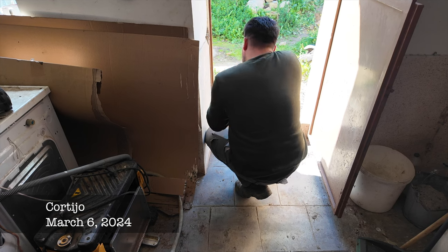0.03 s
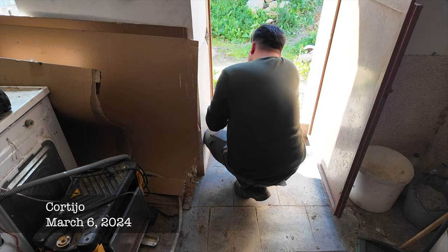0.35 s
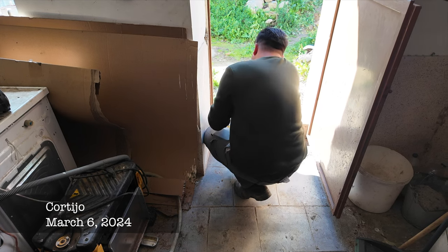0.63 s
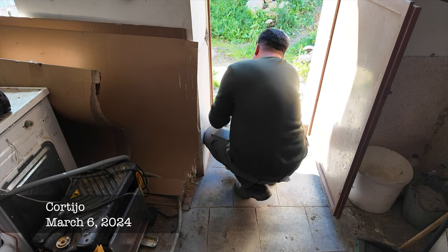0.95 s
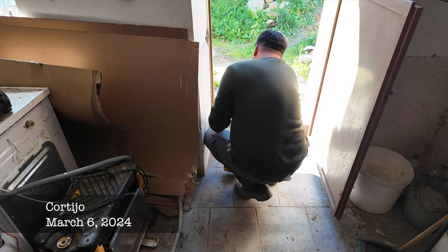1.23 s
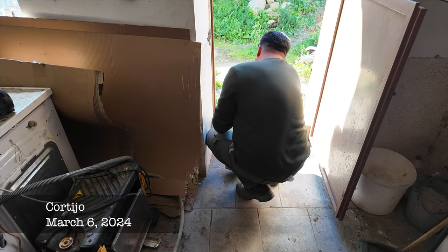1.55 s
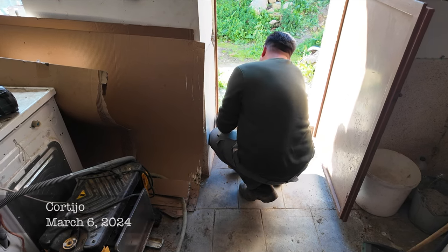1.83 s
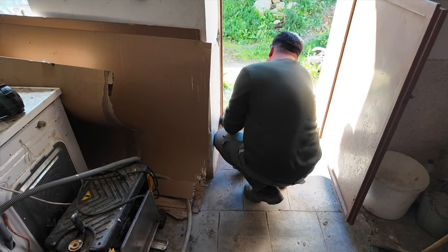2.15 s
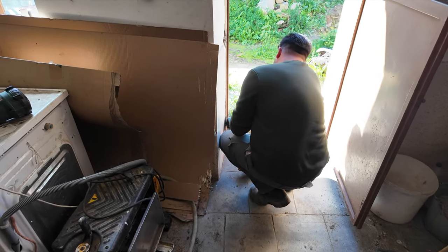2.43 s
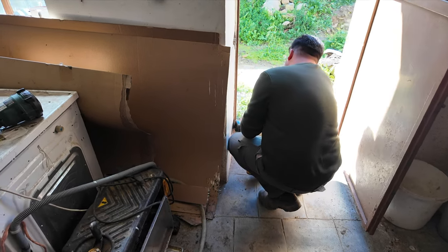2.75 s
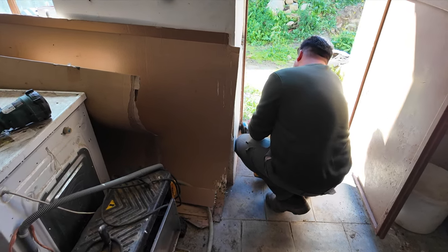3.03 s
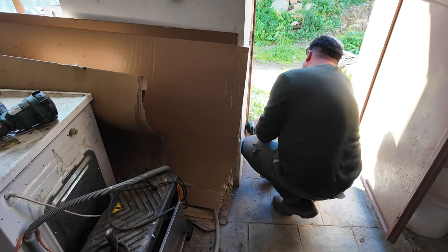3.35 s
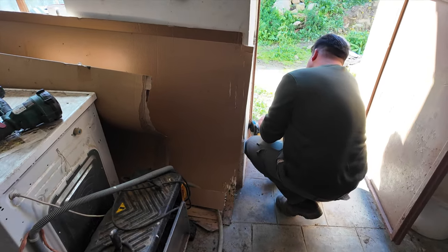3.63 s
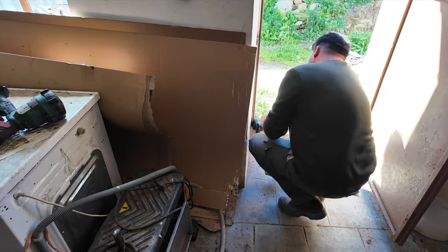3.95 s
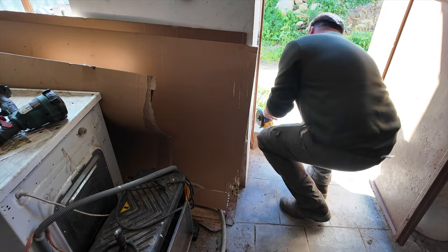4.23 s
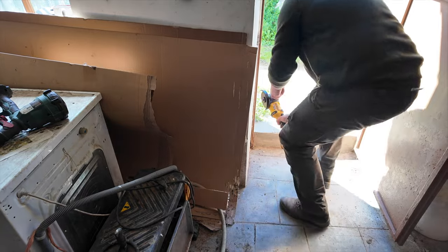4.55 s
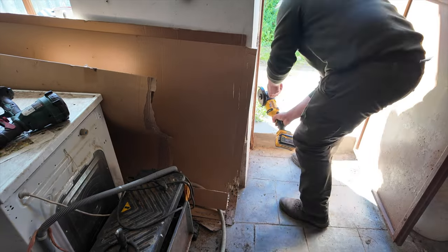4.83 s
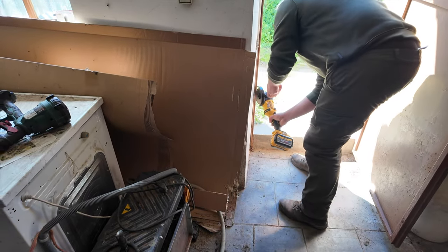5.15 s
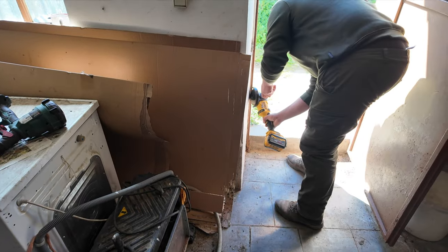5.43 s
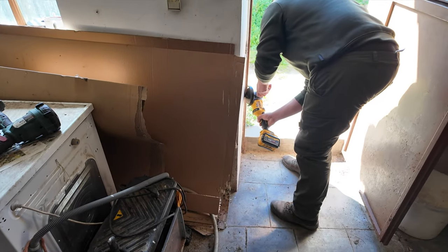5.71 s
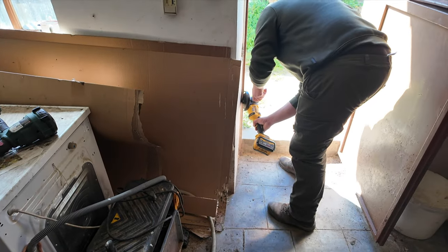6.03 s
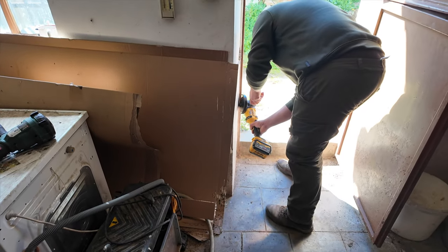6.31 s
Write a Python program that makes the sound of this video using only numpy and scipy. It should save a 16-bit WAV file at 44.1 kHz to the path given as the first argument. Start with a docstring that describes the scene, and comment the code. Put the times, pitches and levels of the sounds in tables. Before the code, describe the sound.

For the first second, shoes scuff softly and grit crunches on a tiled floor. At about 1 second a switch snaps and a cordless angle grinder winds up with a short rising howl, reaching full speed by 1.5 seconds: a steady, rattling gear whir over rushing air and a motor hum. From about 2.1 to 2.8 seconds the disc bites into a wooden door frame with a bright, hissing rasp and thin squeals. A second, longer cut starts with a dull knock at 3 seconds and lasts until 4.1. The grinder then runs free, its hum weaker and its buzz a little brighter, with two soft, low steps at about 4.2 and 4.7 seconds. The third cut runs from 5.4 seconds to the end, around 6.4, rasping and ringing with high whistling tones. Everything sounds nearby, in a small, hard room with short echoes.

```python
"""Angle grinder on a door frame

A man shuffles on gritty tiles, starts a cordless angle grinder and leans it three times into a wooden
door frame. Running free, its bevel gears rattle over the rush of the fan; in the cut the same grit
comes round on every turn and the disc sings on multiples of its speed.
A few dull knocks and steps sit underneath, in a small hard room."""
import sys
import numpy as np
from scipy import signal
from scipy.fft import rfft, irfft, next_fast_len
from scipy.io import wavfile
from scipy.ndimage import uniform_filter1d, map_coordinates

SR = 44100
rng = np.random.default_rng(int(sys.argv[2]) if len(sys.argv) > 2 else 0)


def persist_wave(psi):
    """Save psi, clipped to +-1, as 16-bit WAV."""
    counts = np.round(np.clip(psi, -1, 1) * 32767).astype(np.int16)
    wavfile.write(sys.argv[1], SR, np.atleast_2d(counts).T)


N = 281358
T = np.arange(N) / SR
PINION_TEETH, CROWN_TEETH = 10, 33
SWITCH_ON_S, LIFT_S, LIFT_TAKES_S = 1.028, 4.124, 0.25

# Spin-up, until the governor holds the speed. Each row: time in seconds, motor turns per second.
MOTOR_SPEED = [(1.03, 30), (1.1, 110), (1.2, 208), (1.25, 258), (1.36, 378), (1.43, 417), (1.49, 435),
               (1.55, 438.7)]
# The three cuts. Each row: start and end in seconds, disc ring in dB, treble lift of the fine dust in dB,
# share of the grit that repeats each turn (0-1), ducking of the running noise after one second in dB.
CUTS = [(2.075, 2.85, -42.5, 2.5, 0.35, 7.5), (3.002, 4.127, -40, 4, 0.27, 6.5),
        (5.392, 6.407, -39, 5, 0.4, 9)]


def cutting(disc):
    """Repeating grit and freshly torn fibres rasp and ring the disc, hardest where its rim runs high."""
    # Colours of the rasp and of the disc's ring. Each row: frequency in Hz, level in dB.
    rasp_colour = [(60, -75), (600, -47), (2000, -44), (3100, -7), (4400, -4.5), (5000, -5), (6200, -1.5),
                   (7000, 4.5), (8600, 3.5), (10000, 3), (10700, -4.5), (11300, 0), (12000, -10),
                   (13000, -0.5), (14900, -6), (15800, -1.5)]
    ring_colour = [(60, -75), (300, -54), (500, -17), (700, -18.5), (1000, -30.5), (1300, -10),
                   (1750, -13.5), (1950, -3.5), (2150, 1.5), (2550, -1), (2850, 5), (3150, -8.5),
                   (3800, -16), (6000, -40)]
    # How hard the disc bites, one curve a cut. Each row: time in seconds, relative level in dB.
    bite_curves = [
        [(2.095, -32), (2.129, -32), (2.169, -37), (2.339, -31), (2.505, -35.5), (2.665, -31), (2.791, -38.5),
         (2.809, -32.5), (2.84, -45.5)],
        [(3.005, -31.5), (3.029, -30.5), (3.053, -36), (3.593, -33.5), (3.623, -30), (3.875, -41),
         (3.891, -37.5), (4.095, -37.5), (4.1, -44)],
        [(5.39, -30.5), (5.444, -38.5), (5.482, -32), (5.522, -36.5), (5.612, -34), (6.088, -36), (6.12, -37.5),
         (6.238, -32.5), (6.37, -35.5)],
    ]
    rim, fibres = grit(disc, wear=0.257), noise()
    angle = 2 * np.pi * disc
    runout = amp(0.44 * np.cos(angle) + 0.31 * np.cos(2 * angle) + 2 * np.cos(3 * angle) + drift(rate=97))
    out = np.zeros(N)
    for (start, end, ring_db, dust_db, repeats, _), curve in zip(CUTS, bite_curves):
        drive = runout * (np.sqrt(repeats) * rim + np.sqrt(1 - repeats) * fibres)
        rasp, ring = colour(drive, rasp_colour), colour(drive + 0.16 * rim, ring_colour)
        dust = pass_filter(rasp, "high", hz=10500, order=3)
        bite = level(curve, fade=0.005)
        out += amp(-1) * bite * (rasp + dust * (amp(dust_db) - 1))
        # the disc rings harder as it lands, then follows the bite a little
        landing_db = 2 * held(start, start, .01, 0.036)
        follow = (bite / amp(np.transpose(curve)[1].mean())) ** 0.13
        out += amp(ring_db + landing_db) * follow * held(start, end, 0.0044, 0.028) * ring
    return out


def grit(disc, wear, size=332):
    """Roughness round the rim, met again on every turn; each of its ripples shifts a little as it wears."""
    turns, ripples = int(disc[-1]) + 2, size // 2 + 1
    fresh = 2 * np.pi * rng.random(ripples)
    worn = fresh + wear * np.cumsum(rng.standard_normal((turns, ripples)), axis=0)
    rim = irfft(np.exp(1j * worn), size, axis=1)
    return unit(map_coordinates(rim.ravel(), [disc * size], order=3, mode="nearest"))


def wandering_contact(x, depth_db):
    """As the point of contact wanders, patches of the spectrum swell and sink."""
    spectrum = signal.stft(x, SR, nperseg=512)[2]
    patches = uniform_filter1d(rng.standard_normal(spectrum.shape), size=8, axis=0)
    patches = unit(uniform_filter1d(patches, size=20, axis=1))
    return signal.istft(spectrum * amp(depth_db * patches), SR, nperseg=512)[1][:N]


def squealing(disc):
    """Modes of the disc swell into squeals, locked onto the nearest multiples of its speed."""
    # Each row: start and end in seconds, mode frequency in Hz, level in dB.
    squeals = [(2.24, 2.35, 2790, -56), (2.286, 2.335, 2260, -44), (2.34, 2.74, 1462, -42),
               (2.497, 2.734, 2260, -39.5), (2.697, 2.715, 1462, -45), (3.01, 4.084, 2260, -54),
               (3.01, 3.04, 2925, -42), (3.05, 3.36, 2790, -48), (3.37, 3.556, 2790, -45),
               (3.38, 3.757, 1462, -47.5), (3.565, 3.615, 1462, -46.5), (3.727, 3.99, 2790, -42),
               (3.91, 4.086, 1462, -46.5), (5.405, 5.477, 2790, -39), (5.433, 6.38, 2260, -45),
               (5.457, 6.38, 1462, -55), (5.583, 6.297, 2790, -44.5), (5.653, 5.93, 2260, -49)]
    swells = {}
    for start, end, hz, db in squeals:
        order = disc_harmonic(hz)
        swells[order] = swells.get(order, 0) + amp(db) * held(start, end, attack=0.0097, release=0.014)
    return sum(swell * amp(2.4 * drift(rate=16)) * tone(order * disc, waver=0.22, spread=0.49)
               for order, swell in swells.items())


def singing(disc):
    """Weaker tones of the disc build up through each cut and die after it; the high ones flicker most."""
    # One set of tones a cut. Each row: mode frequency in Hz, relative level in dB.
    tone_sets = [
        [(1061, -50.5), (1992, -48), (2390, -42.5), (4387, -52), (4780, -46), (6643, -45), (6923, -49),
         (8371, -49), (8635, -54), (9948, -44), (11294, -60)],
        [(931.3, -50.5), (2925, -49), (3327, -52), (6912, -54), (7311, -51), (7978, -55), (8236, -48),
         (8635, -45.5), (9706, -60), (9841, -58), (11294, -49)],
        [(532.9, -60.5), (931.3, -46.5), (1992, -47), (2390, -50), (2525, -52), (2659, -52), (4651, -47.5),
         (4920, -45.5), (5184, -46.5), (6110, -46.5), (6772, -47), (6907, -46), (8635, -41.5), (11294, -42)],
    ]
    build_s, fade_s = 0.15, 0.062
    out = np.zeros((2, N))
    for (start, end, *_), tones in zip(CUTS, tone_sets):
        on = (T > start) & (T < end + .3)
        build = 1 - np.exp(-(T[on] - start) / build_s)
        gain = amp(-2) * build * held(start, end - .04, .01, fade_s)[on]
        for hz, db in tones:
            unrest = 0.18 + 0.72 * hz / 10000
            flicker = 1 + unrest * (drift(rate=16)[on] + 1j * drift(rate=14)[on])
            flicker /= np.sqrt(1 + 2 * unrest ** 2)
            apart = rng.choice([-1, 1]) * rng.uniform(0.48, 0.54)
            ears = np.exp(1j * (2 * np.pi * rng.random() + np.array([[apart], [-apart]])))
            carrier = np.exp(2j * np.pi * disc_harmonic(hz) * disc[on])
            out[:, on] += np.sqrt(2) * amp(db) * gain * (ears * flicker * carrier).real
    return out


def gears(speed, motor):
    """Every tooth lands with its own force, in bunches as the backlash opens and shuts."""
    # Colour of the rattle. Each row: frequency in Hz, level in dB.
    rattle_colour = [(60, -75), (300, -58), (500, -46), (1300, -3.5), (1700, -7.5), (2500, 2), (3100, -2.5),
                     (3700, 0), (5700, 1.5), (6400, -1.5), (9000, -1.5), (10200, -5), (11200, -10.5),
                     (13000, -10), (15800, -16)]
    # Resonances of gear case and guard. Each row: frequency and width in Hz, relative level in dB.
    case_modes = [(910, 63, 14), (1290, 67, -6), (2460, 150, -14), (3614, 180, -0.5), (4080, 74, 6),
                  (4226, 50, -1), (4965, 140, 3), (5490, 77, -10.5), (8700, 160, 3)]
    # The guard's buzz. Each row: frequency and width in Hz, level held low and level lifted in dB.
    guard_modes = [(3637, 170, -56, -46.5), (5097, 200, -47, -46), (5420, 580, -53.5, -47)]
    tooth = motor * PINION_TEETH
    force = amp(1.7 * noise()[tooth.astype(int)] + 1.28 * drift(rate=190))
    strike = 0.65 + np.exp(-(tooth % 1) / 0.3)
    blows = noise() * force * strike * (1 + 0.08 * np.cos(2 * np.pi * motor))
    rattle = amp(-33.5) * colour(blows, rattle_colour, case_modes, modes_db=-5.5)
    treble = pass_filter(rattle, "high", hz=8500, order=4)
    rattle -= treble * (1 - above(speed, edge_hz=140, steepness=1.7))  # slow teeth land softly
    rattle += tool_resonances(guard_modes, force)
    fade_in = above(speed, edge_hz=70, steepness=11) * (speed / speed.max()) ** 0.14
    return rattle * fade_in + starting_howl(speed, tooth, force, blows)


def starting_howl(speed, tooth, force, blows):
    """Under starting torque the teeth howl, most when their rate passes the ring of the gear case."""
    case_hz, span_hz, tooth_hz = 2540, 300, speed * PINION_TEETH
    torque = held(SWITCH_ON_S, end=1.44, attack=.002, release=0.046)
    in_tune = 1 / (1 + ((tooth_hz - case_hz) / span_hz) ** 2)
    howl = resonate(band(noise() * force, 600, 9000), tooth_hz, width=340)
    howl += .3 * np.sin(2 * np.pi * tooth)
    howl *= amp(-43 + 10 * in_tune) * above(tooth_hz, edge_hz=1440, steepness=5.4)
    ring = amp(-45) * held(SWITCH_ON_S + 0.032, 1.26, 0.032, 0.051) * resonate(blows, case_hz, width=560)
    return torque * howl + ring


def fan(speed):
    """Air rushes through the vents and buffets the frame, rising with speed; the rotor shudders on the way."""
    # Colours of the rush and of the low buffeting. Each row: frequency in Hz, level in dB.
    rush_colour = [(200, -33.5), (400, -8.5), (650, 0.5), (1000, 6), (1300, -4), (1600, -1), (3000, -7.5),
                   (9000, -43)]
    buffet_colour = [(25, -32), (50, -34), (70, -31), (105, -15), (130, -8.5), (165, -7.5), (230, 5.5),
                     (290, 0), (380, -1), (600, -4.5), (2000, -50)]
    # Peaks of the vents. Each row: frequency and width in Hz, level held low and level lifted in dB.
    vent_modes = [(718, 230, -54.5, -54.5), (1126, 560, -50, -55.5)]
    shudder_hz, span_hz = 275, 65
    pace, gusts = speed / speed.max(), amp(1.46 * drift(rate=120))
    rush = amp(-45) * colour(noise() * gusts, rush_colour)
    rush += tool_resonances(vent_modes, gusts) * pace ** 3
    shudder = amp(-57) * resonate(band(noise(), 143, 600), speed, width=76)
    shudder *= np.exp(-.5 * ((speed - shudder_hz) / span_hz) ** 2)
    buffet = colour(noise(), buffet_colour) * amp(-61 - 2.4 * lifted() + 2.1 * drift(rate=11))
    return rush * pace ** 0.6 + shudder + buffet * pace ** 0.7 * running_gain() ** .5


def motor_tones(speed, motor):
    """Rotor and disc each hum once a turn; teeth and slots whine above them near full speed."""
    # The whine. Each row: multiple of the motor speed, relative level in dB.
    partials = [(4, -32), (10, -20), (20, -25), (29, -25)]
    whine = sum(amp(db) * tone(multiple * motor, waver=.5, spread=.5) for multiple, db in partials)
    # once the tool is lifted, the hum wavers more and dies down
    hum = amp(-44.6 + 2.5 * lifted() * drift(rate=18)) * tone(motor, waver=0.1, spread=0.68)
    # the disc thrums as it first meets the frame
    thrum = tone(motor * PINION_TEETH / CROWN_TEETH, waver=0.39, spread=0.062)
    thrum *= amp(-71) * held(1.95, 2.56, attack=0.18, release=0.3)
    up_to_speed = above(speed, edge_hz=414, steepness=54)
    return up_to_speed * (amp(-16 * lifted()) * (hum + thrum) + amp(-30.5) * whine)


def tool_resonances(modes, force):
    """Resonances fed by noise, each at a level that depends on how the tool is held."""
    out = np.zeros(N)
    for hz, width, low_db, lifted_db in modes:
        gain = amp(low_db + (lifted_db - low_db) * lifted() + 3.6 * drift(rate=6))
        out += gain * resonate(band(noise() * force, .5 * hz, 2 * hz), hz, width)
    return out


def running_gain():
    """The running noise starts with the switch, ducks through each cut and creeps back after it."""
    duck_db = [db * np.sqrt(np.clip(T - start, 0, end - start)) * held(start, end + 0.024, .01, 0.21)
               for start, end, *_, db in CUTS]
    return (T > SWITCH_ON_S) * amp(-np.max(duck_db, axis=0))


def lifted():
    """0 while the tool is held low, 1 once the man has stood up."""
    return np.clip((T - LIFT_S) / LIFT_TAKES_S, 0, 1)


def knocks():
    """Soft blows on frame and floor: a low note in a puff of noise."""
    # Knocks and steps. Each row: start in seconds, relative level in dB, pitch in Hz, t60 in seconds.
    hits = [(1.291, -51.5, 142, 0.55), (2.07, -43, 236, 0.13), (3.071, -33, 395, 0.083),
            (3.075, -54, 170, .1), (4.174, -55, 125, 0.27), (4.725, -55, 86, 0.27), (5.631, -64, 130, .12)]
    out, t = np.zeros(N), T[:SR // 2]
    for start, db, hz, t60 in hits:
        puff = unit(band(rng.standard_normal(len(t)), hz * 0.57, hz * 2.7))
        envelope = amp(db - 60 * t / t60) * (1 - np.exp(-t / 0.0026))
        add(out, start, 0.42 * envelope * (np.sin(2 * np.pi * hz * t) + .5 * puff))
    return out


def clicks():
    """Grit crunches under a shoe, then the switch snaps: short dry bursts of noise."""
    # Each row: start in seconds, relative level in dB, lower and upper edge in Hz, decay in seconds.
    cracks = [(0.172, -51, 700, 4970, .012), (0.265, -42.5, 1580, 2600, 0.05),
              (0.266, -49, 3500, 5600, 0.022), (0.722, -39, 1390, 4330, 0.018),
              (0.956, -45.5, 780, 4930, 0.011), (0.961, -50, 4000, 15000, .005),
              (1.028, -33, 493, 7200, 0.011)]
    out, t = np.zeros(N), T[:SR // 4]
    for start, db, lo_hz, hi_hz, decay in cracks:
        burst = unit(band(rng.standard_normal(len(t)), lo_hz, hi_hz))
        add(out, start, 0.31 * amp(db) * burst * np.exp(-t / decay))
    return out


def shuffle():
    """Soles drag over grains of dirt; the faster, the brighter."""
    # Colour of the scuff. Each row: frequency in Hz, level in dB.
    scuff_colour = [(47, -51), (80, -19), (212, -4.5), (368, -12.5), (524, -6), (932, 0.5), (1110, -6),
                    (1810, -2), (2070, -4.5), (2360, -2), (2810, -9), (3920, -9), (15800, -37)]
    # Each row: start and end in seconds, relative level in dB, treble against the body in dB.
    drags = [(0.0, 0.044, -75.5, -7), (0.182, 0.26, -68.5, -11), (0.295, 0.348, -52.5, -9),
             (0.722, 0.776, -55, -4.5)]
    scrape = colour(noise() * amp(1.6 * drift(rate=500)), scuff_colour)
    treble = pass_filter(scrape, "high", hz=6000, order=2)
    body, treble = unit(scrape - treble), unit(treble)
    out = np.zeros(N)
    for start, end, db, treble_db in drags:
        drag = held(start, end, attack=0.023, release=0.049)
        out += amp(db - 3) * (body * drag + treble * amp(treble_db) * drag ** 1.05)
    return out


def room_tone():
    """A faint, steady bed of noise."""
    # Each row: frequency in Hz, level in dB.
    bed_colour = [(18, -43), (30, -23), (279, -5), (581, -7), (735, -2), (816, -9), (1120, -4), (1270, -5),
                  (15800, -19)]
    return amp(-84.5) * room(colour(noise(), bed_colour), wet_db=-1)


def room(x, wet_db, sets=1):
    """Direct sound plus reflections; a moving source passes through several sets of them in turn."""
    shares = np.array([1.01 + np.cos(2 * np.pi * (1.5 * T + k / sets)) for k in range(sets)]) ** 2
    wet = sum(signal.oaconvolve((x * np.sqrt(share))[None], reflections(), axes=1)[:, :N]
              for share in shares / shares.sum(0))
    return (x + amp(wet_db) * wet) / np.sqrt(1 + amp(wet_db) ** 2 / 2)


def reflections(size=SR // 2):
    """Sparse echoes for each ear, every band dying at its own speed."""
    # The room's decay. Each row: frequency in Hz, t60 in seconds.
    decay_times = [(250, 0.37), (700, 0.29), (1800, 0.44), (4600, 0.25), (12000, 0.24)]
    taps = rng.choice([-1., 1.], (2, size)) * (rng.random((2, size)) < .1)
    taps[:, :SR // 300] = 0  # pre-delay
    hz, t, spectrum = signal.stft(taps, SR, nperseg=256)
    tail = signal.istft(spectrum * amp(-60 * t / read(decay_times, hz)[:, None]), SR, nperseg=256)[1]
    return tail / np.linalg.norm(tail[0])


def disc_harmonic(hz):
    """Which multiple of the disc's full speed lies nearest to hz."""
    return round(hz / (MOTOR_SPEED[-1][1] * PINION_TEETH / CROWN_TEETH))


def tone(turns, waver, spread):
    """A wavering sine; standing waves give each ear its own phase."""
    angle = 2 * np.pi * (turns + rng.random()) + waver * drift(rate=23)
    apart = spread * rng.choice([-1, 1]) * rng.uniform(0.56, 0.76)
    return np.sqrt(2) * (1 + waver * drift(rate=22)) * np.sin(angle + np.array([[apart], [-apart]]))


def resonate(x, hz, width):
    """A steep resonance that follows the curve hz; rms 1."""
    carrier = np.exp(2j * np.pi * np.cumsum(hz * np.ones(N)) / SR)
    pole = np.exp(-np.pi * width / SR)
    return unit((carrier * signal.lfilter([1], [1, -2 * pole, pole * pole], x / carrier)).real)


def colour(x, points, modes=(), modes_db=0):
    """Filters by a smooth spectrum on which resonances stand; rms 1."""
    size = next_fast_len(N)
    hz = np.fft.rfftfreq(size, 1 / SR)
    peaks = sum(amp(db + modes_db) / (1 + 2j * (hz - f) / width) for f, width, db in modes)
    return unit(irfft(rfft(x, size) * amp(read(points, hz)) * (1 + peaks), size)[:N])


def band(x, lo_hz, hi_hz):
    """Band-pass."""
    return signal.sosfilt(signal.butter(3, [lo_hz, hi_hz], "band", fs=SR, output="sos"), x)


def pass_filter(x, kind, hz, order):
    """Zero-phase high- or low-pass."""
    return signal.sosfiltfilt(signal.butter(order, hz, kind, fs=SR, output="sos"), x)


def read(points, hz):
    """Reads rows of frequency and value on a log-frequency axis."""
    f, value = np.transpose(points)
    return np.interp(np.log(hz + 1), np.log(f + 1), value)


def level(rows, fade):
    """Gain from rows of seconds and dB, fading out beyond the first and last row."""
    times, db = np.transpose(rows)
    return amp(np.interp(T, times, db)) * held(times[0], times[-1], fade, fade)


def held(start, end, attack, release):
    """Swells up to start, holds until end, then dies away; all in seconds."""
    return np.exp(-np.minimum(np.maximum(start - T, 0) / attack + np.maximum(T - end, 0) / release, 50))


def above(hz, edge_hz, steepness):
    """Rises from 0 to 1 as hz passes the edge."""
    return 1 / (1 + (edge_hz / hz) ** steepness)


def noise():
    """White noise."""
    return rng.standard_normal(N)


def drift(rate):
    """A random curve with rate new values a second; rms 1."""
    return unit(np.interp(T * rate, np.arange(4096), rng.standard_normal(4096)))


def amp(db):
    """Decibels to gain."""
    return 10 ** (np.asarray(db) / 20)


def unit(x):
    """Scales to rms 1."""
    return x / np.sqrt(np.mean(x ** 2) + 1e-20)


def add(mix, start, sound):
    """Mixes a sound in at start seconds."""
    part = mix[round(start * SR):][:len(sound)]
    part += sound[:len(part)]


def scene():
    """One motor speed drives gears, fan and disc; all sound in the same room."""
    speed = np.interp(T, *np.transpose(MOTOR_SPEED)) * (1 + .0005 * drift(rate=14))
    motor = np.cumsum(speed) / SR  # motor and disc positions count turns
    # the disc shudders in the play of its gears, which blurs its highest tones
    disc = motor * PINION_TEETH / CROWN_TEETH + .0012 * drift(rate=55)
    gain = running_gain()
    air = gain * fan(speed)
    bass = pass_filter(air, "low", hz=330, order=2)  # reaches both ears alike
    mix = room(gain * gears(speed, motor), wet_db=-0.5, sets=3)
    mix += room(air - bass, wet_db=-3.5, sets=3)
    mix += gain * motor_tones(speed, motor)
    mix += room(wandering_contact(cutting(disc), depth_db=1.9), wet_db=-2.5, sets=3)
    mix += squealing(disc) + singing(disc)
    mix += room_tone()
    mix += room(bass + knocks(), wet_db=-26)
    return mix + room(shuffle(), wet_db=-3) + room(clicks(), wet_db=7)


def record(dry):
    """The microphone's low cut, then the band limit."""
    dry = signal.sosfilt(signal.butter(2, 45, "high", fs=SR, output="sos"), dry)
    top_cut = signal.firwin(511, 15880, window=("kaiser", 9), fs=SR)
    return signal.oaconvolve(dry, top_cut[None], "same", axes=1)


dry = scene()
out = record(dry)
persist_wave(out)
```